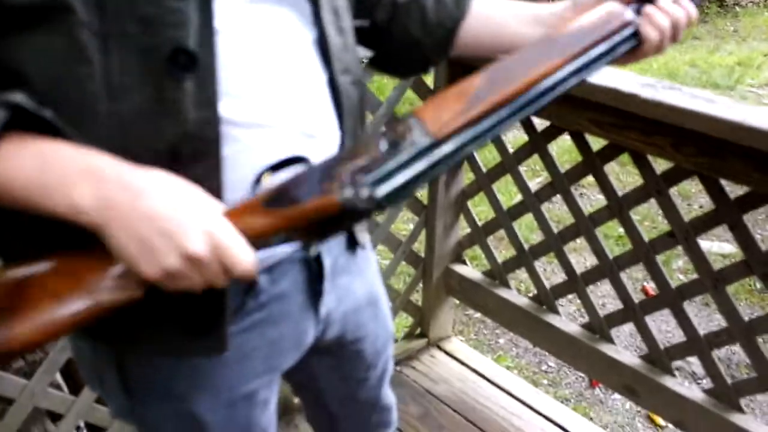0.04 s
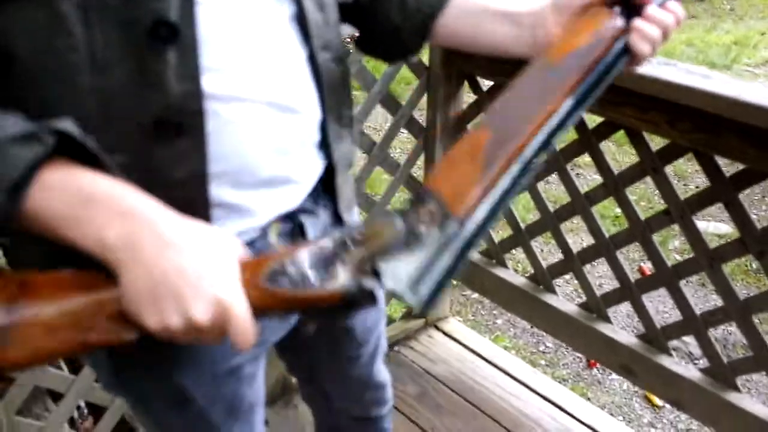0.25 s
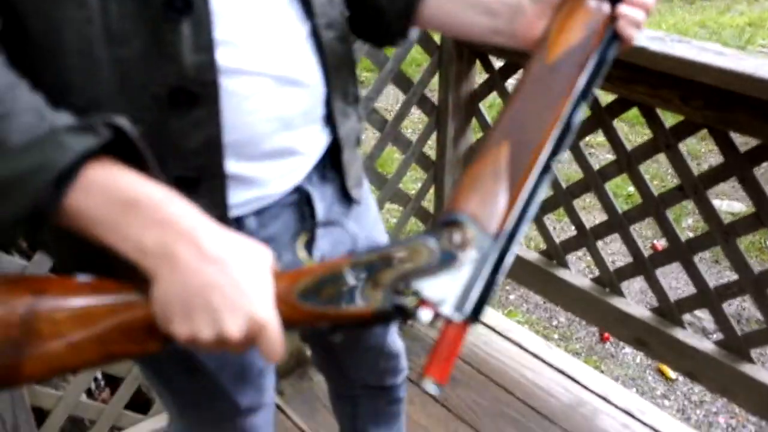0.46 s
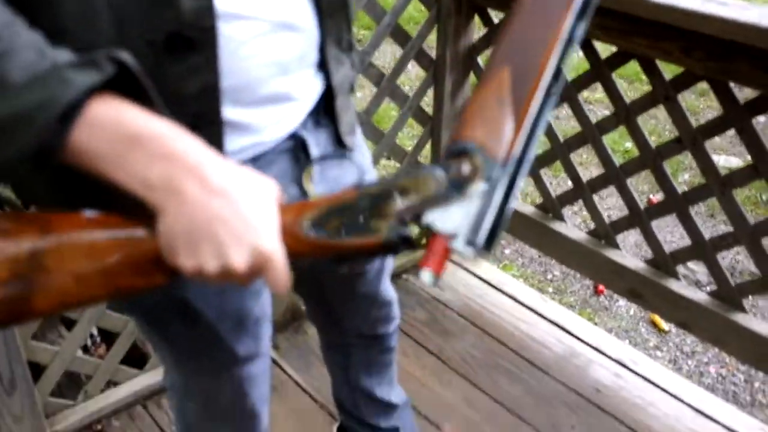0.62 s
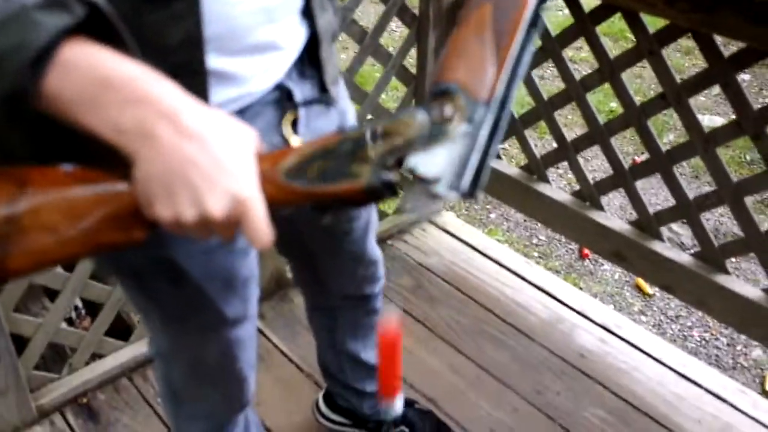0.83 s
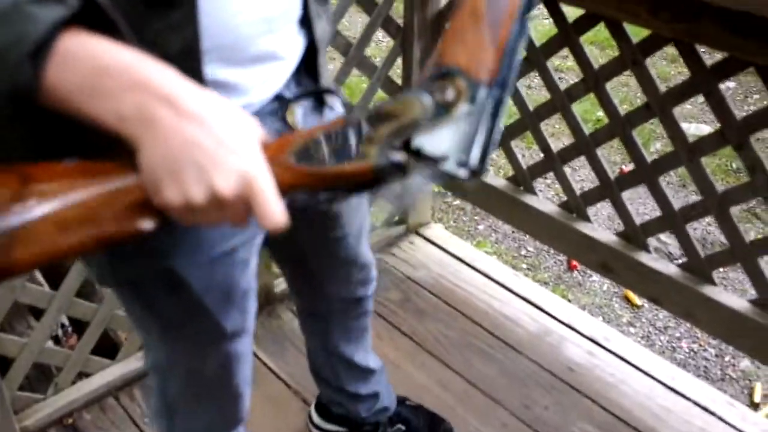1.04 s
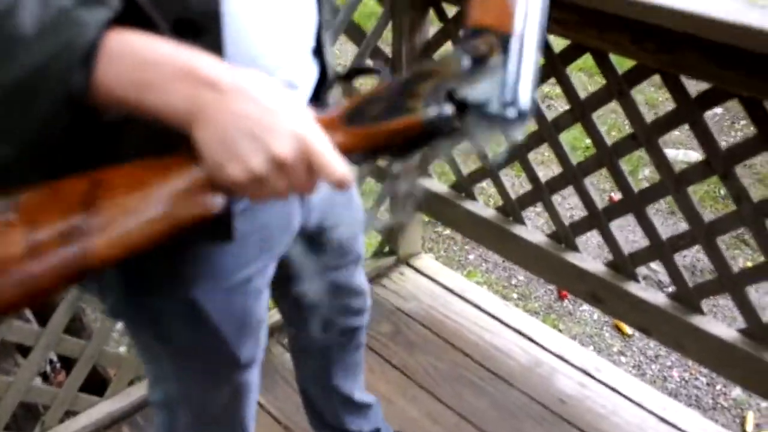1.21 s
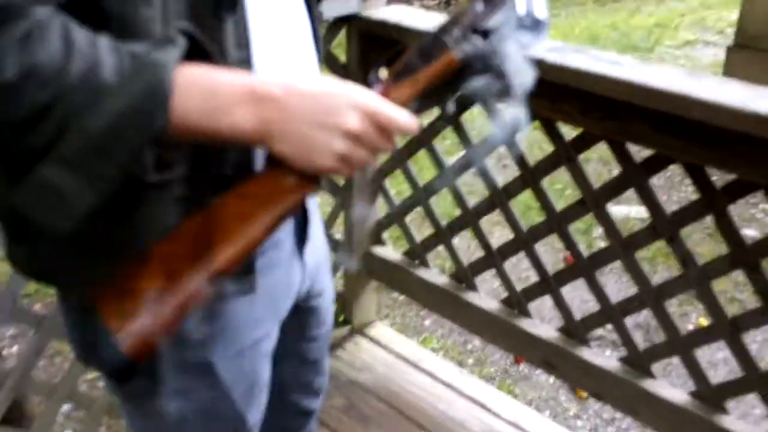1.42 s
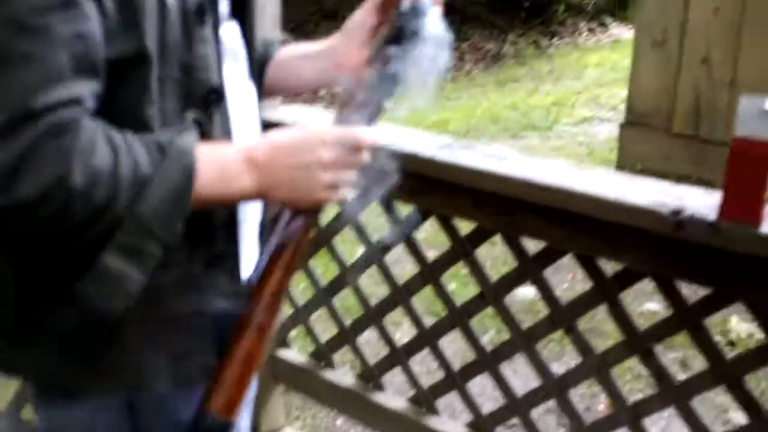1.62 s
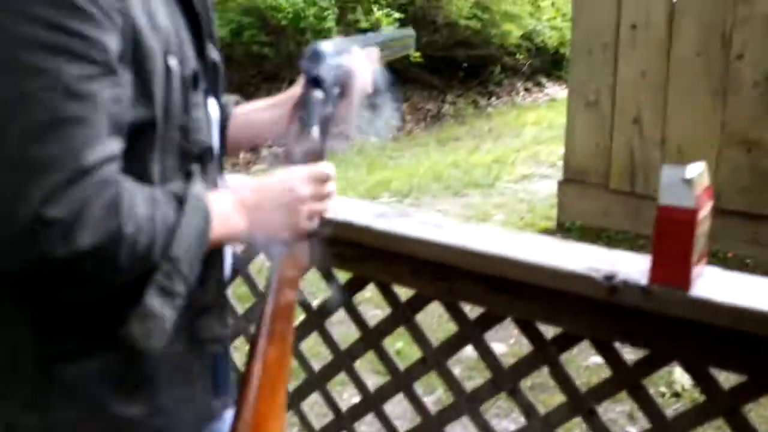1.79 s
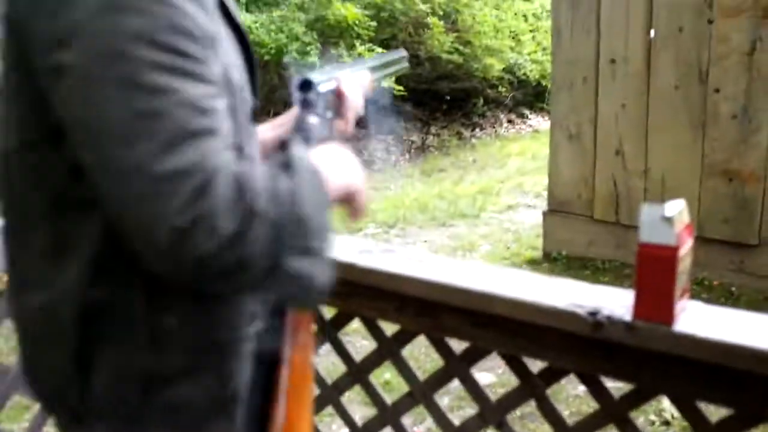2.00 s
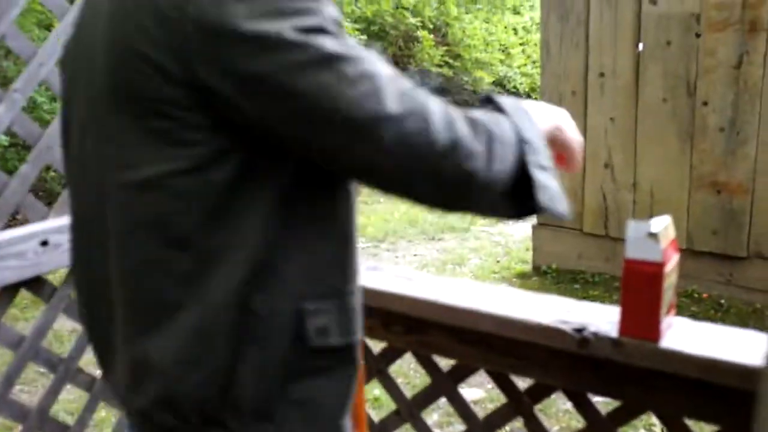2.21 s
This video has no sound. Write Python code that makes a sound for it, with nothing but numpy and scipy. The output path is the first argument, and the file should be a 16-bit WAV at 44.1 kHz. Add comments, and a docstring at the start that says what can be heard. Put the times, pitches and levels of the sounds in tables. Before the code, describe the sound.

Close to a stereo microphone outdoors, a shotgun's lever and lock snap and the barrels drop open. An empty shell slips out and clatters on wooden boards with short echoes, followed by light taps on the gun and rustling cloth.

```python
"""Sharp steel clicks, close to a stereo pair of microphones: a break-action shotgun is opened on a wooden
deck outdoors. Lever and lock snap, the hinge rubs and the barrels drop against their stop. A spent shell
slides out of the chamber with a hollow hiss, then bounces and rattles on the boards below, making them
ring. A jacket rustles and hands tap the gun, over faint open air and a thin drone that comes in late.
Boards, railing and wall throw back short echoes of gun and shell."""
import sys
import numpy as np
from scipy import signal
from scipy.fft import rfft, irfft, next_fast_len
from scipy.io import wavfile
from scipy.ndimage import uniform_filter1d

SR = 44100
rng = np.random.default_rng(int(sys.argv[2]) if len(sys.argv) > 2 else 0)


def wav_record(signal):
    """Record a signal, one row per channel, as 16-bit PCM in the file named by sys.argv[1]."""
    frames = np.transpose(np.atleast_2d(signal))
    bounded = np.clip(frames, -1, 1)
    # unit amplitude maps onto the largest positive 16-bit level
    quanta = np.round(bounded * 32767).astype(np.int16)
    wavfile.write(sys.argv[1], SR, quanta)


N = 103635
TIME = np.arange(N) / SR
SIZE = 2 * next_fast_len(N)
FREQS = np.maximum(np.fft.rfftfreq(SIZE, 1 / SR), 1)

# resonances and hollows of the chamber: f/Hz, width/Hz, lift/dB
CHAMBER = [(2034, 220, 11.5), (2937, 390, 14), (3830, 200, 12), (4840, 140, -15), (5126, 130, 11.5),
           (5300, 180, 0), (6020, 110, 6), (8640, 140, 6.5), (9430, 120, 6), (11400, 160, 7)]
# the shell meets the boards: t/s, rise/s, decay/s, thump/dB, hardness/(dB/octave), knock/dB, tube/dB, rim/dB
SHELL_HITS = [(0.8676, 0.0007, 0.0079, -31.5, -4.5, -21, -21.5, -14.5),
              (.880, 0.0028, 0.011, -33.5, 12.5, -21, -21, -22.5),
              (0.898, 0.0013, 0.0037, -40, 13, -24, -34, -20.5),
              (0.907, 0.0015, 0.019, -33, 9, -29, -33.5, -31),
              (.919, 0.0019, 0.0031, -32.5, 3, -28, -35, -26.5),
              (.968, 0.0014, 0.0064, -37.5, -1, -25.5, -29, -18.5),
              (0.9761, 0.001, 0.0045, -43.5, 15, -27.5, -25.5, -21.5),
              (1.003, .0005, 0.0027, -45, 1, -34, -38, -39),
              (1.032, 0.0037, 0.0053, -63, -13, -25, -36, -21.5),
              (1.037, .001, 0.0081, -39.5, -11, -30, -30, -27.5),
              (1.055, 0.0027, 0.0039, -43, 6, -29.5, -50, -56),
              (1.0933, 0.00019, 0.0015, -17, 1.5, -17, -12, -15.5),
              (1.097, 0.00092, 0.0069, -28.5, 18, -20, -38, -38),
              (1.128, 0.0036, 0.015, -22.5, 0, -28, -40, -38),
              (1.1424, 0.00047, 0.0024, -35, 8.5, -30, -30, -16.5),
              (1.157, 0.00075, 0.0028, -32.5, 0, -42, -43, -27.5),
              (1.174, 0.0014, 0.023, -46, 2, -31, -38.5, -36.5),
              (1.202, 0.0039, 0.024, -32.5, -11, -47, -35.5, -45),
              (1.213, 0.00095, 0.0014, -17, 2.5, -20, -24, -20.5),
              (1.222, 0.0011, 0.0019, -52, 11, -31, -34, -25.5),
              (1.229, 0.00062, 0.0019, -27, -7, -17, -43, -28),
              (1.233, 0.00018, 0.0028, -42, -8, -26, -28.5, -23),
              (1.268, 0.0016, 0.017, -52, -5, -32, -32.5, -33),
              (1.28, 0.0013, 0.005, -28.5, 2, -16, -21.5, -23),
              (1.326, 0.0088, 0.0044, -25.5, 1.5, -30.5, -36, -38),
              (1.339, 0.00031, 0.0017, -35, -7, -14.5, -21.5, -40),
              (1.345, 0.00055, 0.0034, -44, -5, -40, -17, -21),
              (1.350, 0.00068, 0.0014, -39, 9, -30, -35, -17),
              (1.361, 0.00091, 0.0098, -42, -10, -30.5, -37, -41),
              (1.375, 0.00054, 0.0015, -63, 7, -27, -26, -30),
              (1.385, 0.00041, 0.0044, -64, 4, -37, -31.5, -40),
              (1.398, 0.00037, 0.006, -57, 2, -45, -36, -41.5),
              (1.442, 0.0036, 0.012, -62, 14, -32.5, -40.5, -45.5),
              (1.453, 0.0014, 0.013, -66, 17, -39.5, -55, -46),
              (1.48, 0.00087, 0.009, -67, -5, -56, -43.5, -46)]
# paths to the microphones from gun height and from the boards:
# f/Hz, left-right likeness, left minus right/dB, left lead/rad
FROM_GUN = [(30, 0.25, 1, -0.2), (150, 0.7, 4, -0.6), (1200, 0.88, 3, -0.74), (2850, 0.38, 0, -0.76),
            (5300, 0.046, 0, -0.5), (10000, 0.45, 0, 0.2), (14000, 0.85, 0.5, 0.1)]
FROM_BOARDS = [(500, .99, 5, -0.17), (1400, 0.95, 2, -0.2), (3000, 0.8, 1.5, -0.7), (6000, 0.32, -3, -1),
               (10100, 0.68, -1, 0.18)]


def gun_clicks():
    """Lever, lock and barrels strike, later hands tap the gun; the chamber lightly colours each knock."""
    # the action, then hands and cuffs: t/s, rise/s, decay/s, stock/dB, steel/dB, edge/dB
    clicks = [(.221, 0.0008, 0.0043, -32.5, -31.5, -33), (.226, 0.0021, 0.0059, -38, -51, -46),
              (.232, 0.00078, 0.0031, -28.5, -21, -27), (.238, 0.0012, 0.012, -35, -45, -55),
              (.2595, .0005, 0.0047, -53, -31, -28.5), (.269, 0.0015, 0.014, -38.5, -38, -53),
              (.287, 0.00078, .003, -35, -20, -29), (.3075, 0.00055, 0.0048, -28.5, -21.5, -27),
              (.3128, 0.00037, 0.0018, -27, -18, -11), (.318, .001, 0.0078, -55, -49, -29),
              (.3345, 0.0006, 0.0049, -61, -55, -29.5), (.359, 0.00033, 0.00092, -22, -24.5, -15),
              (.362, 0.00085, 0.0035, -34, -41, -23), (.488, 0.0035, 0.0055, -35, -36, -51),
              (.498, 0.00081, 0.0046, -30.5, -29.5, -34), (.5116, 0.00033, 0.0029, -27, -30, -21.5),
              (.5366, 0.00051, 0.0016, -32, -32, -11), (.5397, 0.00028, 0.004, -31.5, -18, -14.5),
              (.547, 0.0034, 0.0037, -31, -18.5, -12.5)]
    taps = [(1.563, 0.0012, 0.0036, -42.5, -42, -57), (1.71, 0.001, 0.019, -46, -46.5, -53),
            (1.814, 0.004, 0.011, -52, -63, -74), (1.868, .003, 0.005, -50, -46, -66),
            (2.004, .0005, 0.0024, -36.5, -60, -60), (2.0555, .0003, 0.0037, -52, -47, -38.5),
            (2.065, 0.0015, 0.0038, -49, -57, -48), (2.119, 0.0005, 0.0012, -49, -39.5, -30.5)]
    colour = [(130, -18.5), (400, -20.5), (900, -9), (1500, -4), (2200, 5), (4000, 3.5), (7000, -0.5),
              (10500, 5), (13000, -0.5), (16000, -11)]  # the gun's body: f/Hz, level/dB
    faint_chamber = [(hz, width, 0.49 * db) for hz, width, db in CHAMBER]
    return contacts(clicks + taps, response(colour, faint_chamber))


def hinge_rub():
    """Friction in the hinge while the barrels move."""
    pressure = [(.2, -50.5), (.235, -46), (.33, -54.5), (.4, -53), (.45, -43), (.475, -44), (.52, -47),
                (.56, -60), (.74, -46), (.84, -47.5), (.9, -43)]  # strength of the rub: t/s, level/dB
    colour = [(200, -19), (1000, 2), (3000, -1.5), (6000, -5.5), (10000, -1), (16000, -15)]  # its spectrum: f/Hz, level/dB
    turning = (TIME > pressure[0][0]) & (TIME < pressure[-1][0])
    return turning * level(pressure) * shaped(grit(rough_db=3.0), response(colour))


def shell_slide():
    """The shell rubs along the chamber, which colours the hiss; a thin steel part rings along."""
    colour = [(150, -29), (700, -11), (1500, -9.5), (2500, -5), (4000, -1), (7000, -3), (10500, 1),
              (13000, -4.5), (16000, -15)]  # sliding friction: f/Hz, level/dB
    start_s, rise_s, peak_s, ring_hz = 0.565, 0.0053, 0.609, 4107
    peak_db, swell_db_per_s, fade_db_per_s = -27.5, 101, 94
    past_peak = TIME - peak_s
    db = peak_db + np.minimum(swell_db_per_s * past_peak, -fade_db_per_s * past_peak)
    force = amp(db) * np.clip((TIME - start_s) / rise_s, 0, 1)
    hiss = shaped(force * grit(rough_db=-0.9), response(colour, CHAMBER))
    ring = amp(-29) * swell(start=0.561, rise=0.035, decay=0.032) * np.sin(2 * np.pi * ring_hz * TIME)
    return hiss + ring


def shell_bounces():
    """The empty shell clatters on the boards with its tube and rim."""
    colour = [(130, -23.5), (280, -13), (450, -3.5), (700, -5.5), (1400, -5), (2200, -5), (4500, -11),
              (7800, -19), (10000, -14.5), (12500, -15), (15000, -33)]  # shell on wood: f/Hz, level/dB
    resonances = [(483, 70, 8.2), (824, 22, 1.8), (1048, 17, 7.2), (2010, 280, 6.1), (2780, 300, 4.7),
                  (3310, 140, 7.5), (5070, 460, 7.4), (7060, 560, 5.9), (9880, 630, 5.4)]  # its resonances: f/Hz, width/Hz, lift/dB
    return contacts(SHELL_HITS, response(colour, resonances))


def pings():
    """Gun and shell ring briefly, each contact at a pitch set by where the part is struck."""
    # rings of the gun's parts, then of the shell's brass head and tube: t/s, f/Hz, level/dB, decay/s
    gun_pings = [(0.225, 944, -24, 0.003), (.234, 620, -29, 0.0051), (.288, 2790, -15, 0.0026),
                 (0.3086, 2000, -21, 0.0033), (.3105, 2930, -17.5, 0.003), (.359, 1148, -24, 0.0037),
                 (.359, 786, -31, 0.004), (0.358, 4480, -9, 0.0004), (0.363, 4900, -18, 0.0025),
                 (.549, 2067, -7.5, 0.0023), (0.5496, 2907, -8.5, 0.0033), (0.5491, 3880, -14, 0.0039),
                 (1.816, 640, -35, 0.004), (1.825, 536, -36, 0.0069), (1.82, 3790, -59, 0.05),
                 (2.1185, 10700, -25, 0.0006)]
    shell_pings = [(.897, 4600, -18.5, 0.0062), (.912, 4520, -23.5, .006), (.976, 523, -24.5, 0.0066),
                   (1.038, 494, -22.5, 0.0094), (1.0927, 4200, -5, 0.00078), (1.0927, 2670, -11.5, 0.0012),
                   (1.0929, 1970, -12, 0.0012), (1.132, 5150, -25, 0.0045), (1.2135, 480, -10.5, 0.0036),
                   (1.214, 1876, -17.5, 0.0028), (1.2137, 2340, -14, 0.0015), (1.228, 1870, -26, 0.004),
                   (1.2805, 6880, -15, 0.0013), (1.282, 3380, -17, 0.002), (1.282, 5020, -17.5, 0.0018),
                   (1.349, 4890, -19, 0.002), (1.35, 9900, -14, 0.0012), (1.456, 520, -26.5, 0.0065),
                   (1.481, 4880, -39, 0.0036)]
    rise_s, out = 0.00092, 0
    for rows, path in (gun_pings, FROM_GUN), (shell_pings, FROM_BOARDS):
        rings = sum(amp(db) * swell(s, rise_s, decay) * np.sin(2 * np.pi * hz * (TIME - s))
                    for s, hz, db, decay in rows)
        out = out + at_microphones(np.array([low_cut(rings), np.zeros(N)]), path)
    return out


def deck():
    """Every landing rings the boards, a little to the left; harder contacts favour the upper modes."""
    modes = [(173, -13, 0.16), (187, -12.5, 0.07), (203.5, -0.5, 0.11), (244, -2, 0.035),
             (345, -1.5, 0.041), (388.4, -4, 0.095), (494, -11, 0.056), (535.5, -17, 0.19),
             (625, -16, 0.018), (677, -16, 0.042), (802.4, -7, 0.044)]  # modes of the boards: f/Hz, level/dB, t60/s
    s, rise, _, thump_db, hardness = np.transpose(SHELL_HITS)[:5]
    landings = ((s + rise / 2) * SR).astype(int)
    out = 0
    for hz, db, t60 in modes:
        scatter_db = 0.3 * rng.standard_normal(len(s))
        blows = np.zeros(N)
        blows[landings] = amp(thump_db + db + hardness * np.log2(hz / 300) + scatter_db)
        radius, angle = amp(-60 / (t60 * SR)), 2 * np.pi * hz / SR
        feedback = [1, -2 * radius * np.cos(angle), radius ** 2]
        out = out + signal.lfilter([0, np.sin(angle)], feedback, blows + 1e-18)
    return low_cut(out) * amp([[2.5], [-2.5]])


def porch(x):
    """Short scatter from the nearby boards, railing and wall."""
    colour = [(100, -1), (600, 2), (5000, -0.5), (16000, -4)]  # the echoes' spectrum: f/Hz, level/dB
    echo_db, t60_s, delay_s = -14.5, 0.23, 0.0056
    tail = grit(rough_db=4.5) * amp(-60 * TIME / t60_s) * (TIME > delay_s)
    tail /= np.sqrt(np.sum(tail ** 2) / 2)
    echoes = at_microphones(shaped(tail, response(colour)), FROM_BOARDS)
    return amp(echo_db) * signal.fftconvolve(x.mean(axis=0)[None], echoes, axes=1)[:, :N]


def jacket():
    """Cloth rubs with a coarse grain, loudest near the end."""
    movement = [(0, -59), (.2, -74), (1.5, -60), (1.64, -52), (1.77, -68), (1.86, -75), (2.03, -69),
                (2.14, -52.5), (2.28, -46), (2.35, -59)]  # strength of the rustle: t/s, level/dB
    colour = [(100, 12), (400, 8), (1500, 6), (3500, 2.5), (6500, -4), (11000, 1), (16000, -14)]  # the cloth: f/Hz, level/dB
    return level(movement) * shaped(grit(rough_db=2, size=120), response(colour))


def outdoor_air():
    """A faint, low wash of open air that drifts in level."""
    colour = [(25, -17), (50, -9.5), (100, 0), (200, -4.5), (460, -3), (900, -5), (2000, -12), (3500, -15),
              (6200, -21), (11000, -21), (16000, -33)]  # the air's spectrum: f/Hz, level/dB
    drift = [(0, -47.5), (.15, -50.5), (.8, -53.5), (1.1, -48.5), (1.4, -49), (1.55, -53), (1.75, -51),
             (1.85, -49), (2.13, -49), (2.35, -51)]  # its rise and fall: t/s, level/dB
    return level(drift) * shaped(grit(rough_db=1.5), response(colour))


def drone():
    """Two narrow bands of noise, about an octave apart, make a thin wavering tone."""
    start_s, rise_s, half_width_hz = 1.725, 0.061, 19
    tone = 0
    for hz, db in (440, -56.5), (890, -57):
        band = 1 / (1 + ((FREQS - hz) / half_width_hz) ** 2)
        tone = tone + amp(db) * shaped(rng.standard_normal((2, N)), band)
    return tone * np.clip((TIME - start_s) / rise_s, 0, 1)


def contacts(rows, body):
    """Each contact is a brief chatter; its last three columns drive a body's low, middle and high bands."""
    edges = [170, 1200, 4500, 15500]  # limits of the three bands: f/Hz
    out, shapes = 0, [swell(*row[:3]) for row in rows]
    for k, (low, high) in enumerate(zip(edges, edges[1:])):
        force = np.sqrt(sum((amp(row[k - 3]) * shape) ** 2 for row, shape in zip(rows, shapes)))
        band = 1 / np.sqrt((1 + (low / FREQS) ** 8) * (1 + (FREQS / high) ** 8))
        out = out + shaped(force * grit(rough_db=1.5, size=8), body * band)
    return out


def at_microphones(pair, path):
    """Mid and side signals become left and right, with the path's likeness, balance and phase lead."""
    mid, side = rfft(pair, SIZE)
    alike, balance_db, lead = (at_hz([(row[0], row[k]) for row in path]) for k in (1, 2, 3))
    sign = np.array([[1], [-1]])
    both = np.sqrt((1 + alike) / 2) * mid + sign * np.sqrt((1 - alike) / 2) * side
    return irfft(both * amp(sign * balance_db / 2) * np.exp(.5j * sign * lead))[:, :N]


def grit(rough_db, size=40):
    """Two unrelated friction noises that share an uneven grain, `size` samples long."""
    grain = amp(rough_db * uniform_filter1d(rng.standard_normal(N), size) * np.sqrt(size))
    return rng.standard_normal((2, N)) * grain / np.sqrt(np.mean(grain ** 2))


def swell(start, rise, decay):
    """Rise to one, then die away; times in seconds."""
    age = TIME - start
    return np.clip(age / rise, 0, 1) ** 2 * np.exp(-np.clip((age - rise) / decay, 0, 32))


def shaped(x, gain):
    """Causal filter with the shape of this gain, keeping the power of white noise."""
    cepstrum = irfft(np.log(gain / np.sqrt(np.mean(gain ** 2)) + 1e-6))
    cepstrum[1:SIZE // 2] *= 2  # fold onto positive time for minimum phase
    cepstrum[SIZE // 2 + 1:] = 0
    return irfft(rfft(x, SIZE) * np.exp(rfft(cepstrum)))[..., :N]


def response(colour, resonances=()):
    """A broad colour with resonant peaks and hollows on it."""
    peaks_db = sum(db / (1 + (2 * (FREQS - hz) / width) ** 2) for hz, width, db in resonances)
    return amp(at_hz(colour) + peaks_db)


def low_cut(x, hz=171):
    """Small parts and thin boards radiate no deep bass."""
    return signal.sosfilt(signal.butter(8, hz, btype="high", fs=SR, output="sos"), x + 1e-18)


def at_hz(points):
    """A table joined by lines on a log-frequency axis."""
    hz, value = np.transpose(points)
    return np.interp(np.log(FREQS), np.log(hz), value)


def level(points):
    """Gain over time from rows of t/s, level/dB."""
    return amp(np.interp(TIME, *np.transpose(points)))


def amp(db):
    """Decibels to gain."""
    return 10 ** (np.asarray(db) / 20)


def scene():
    """The gun close to the microphones, shell and deck below it, open air all round."""
    shell = at_microphones(shell_bounces(), FROM_BOARDS)
    gun = at_microphones(gun_clicks() + hinge_rub() + shell_slide(), FROM_GUN)
    near = gun + shell + deck()
    rings = pings()
    echoes = porch(near + 0.61 * rings)  # the pings stay a little drier
    background = at_microphones(outdoor_air() + jacket() + drone(), FROM_GUN)
    return near + rings + echoes + background


def record(dry):
    """A steep low-pass cuts the very top of the treble."""
    cutoff_hz = 16000
    return signal.sosfilt(signal.ellip(10, .2, 80, cutoff_hz, fs=SR, output="sos"), dry)


dry = scene()
out = record(dry)
wav_record(out)
```